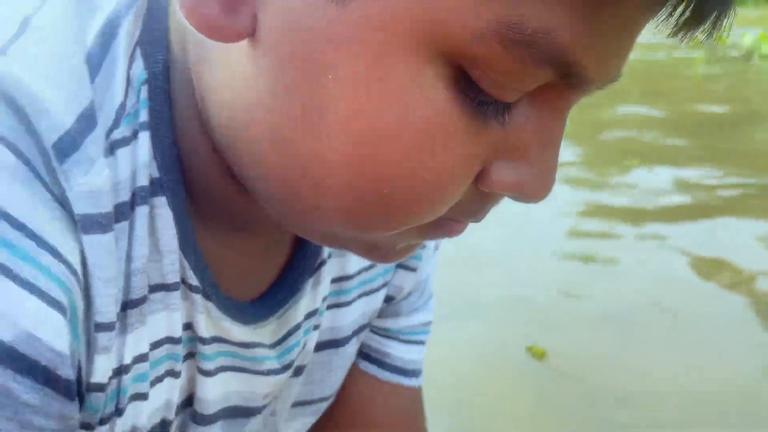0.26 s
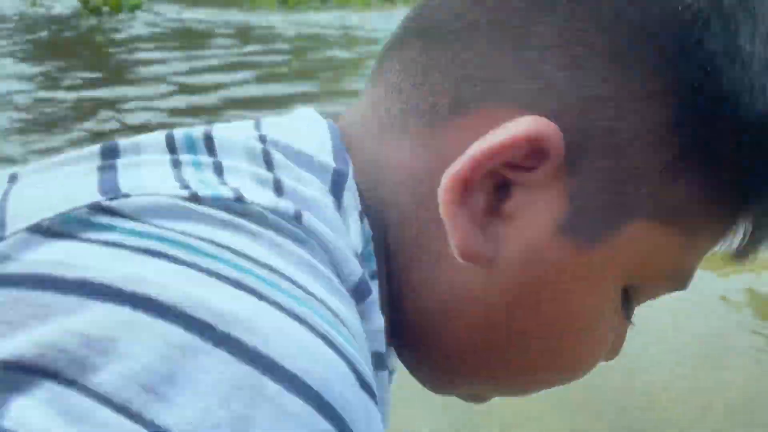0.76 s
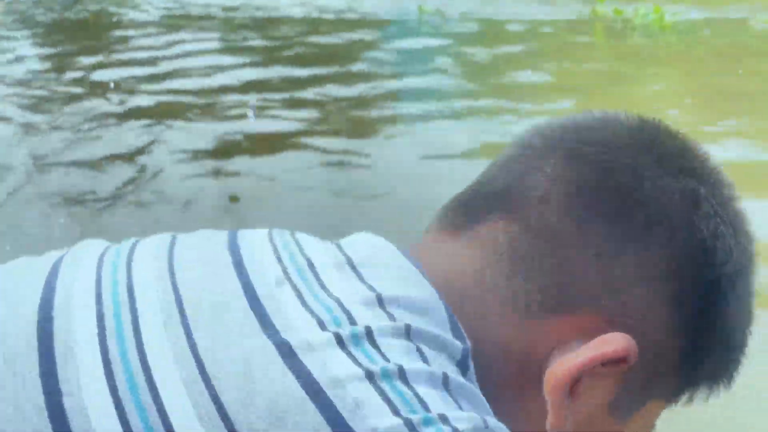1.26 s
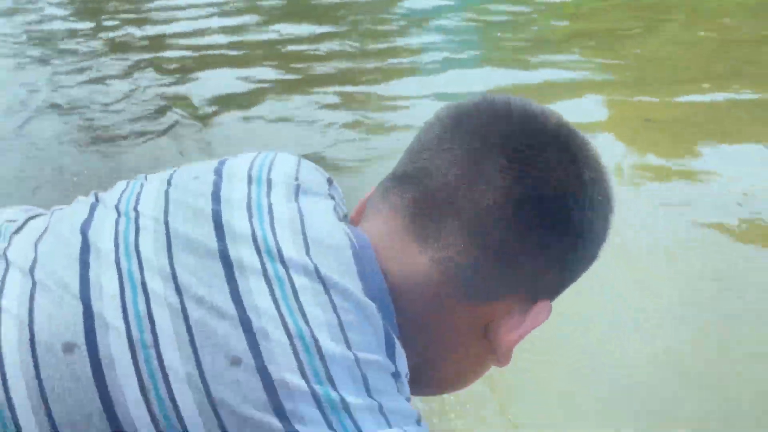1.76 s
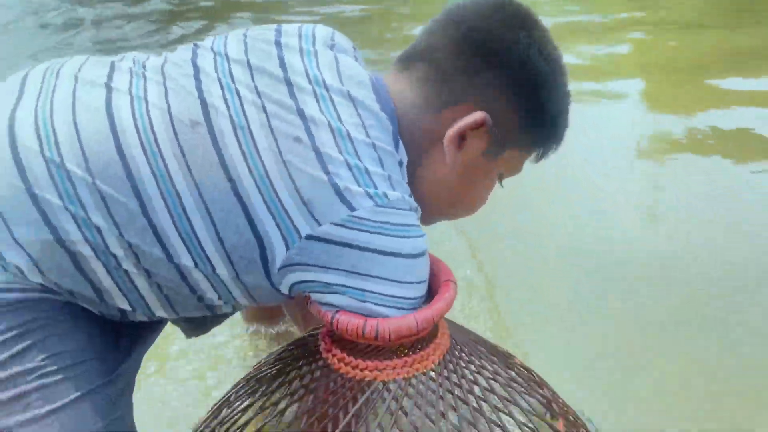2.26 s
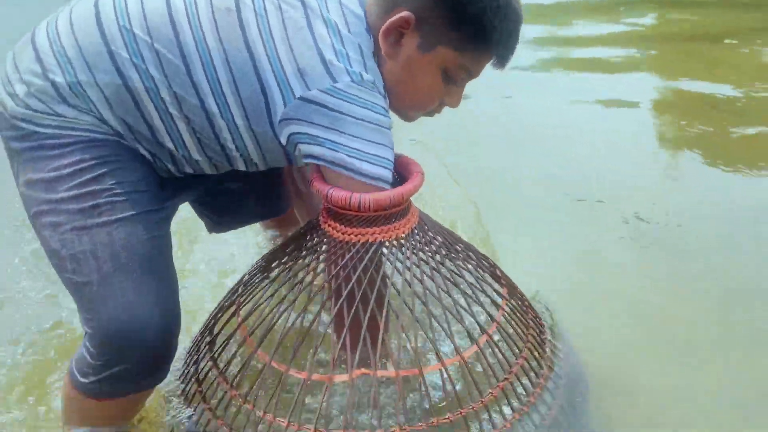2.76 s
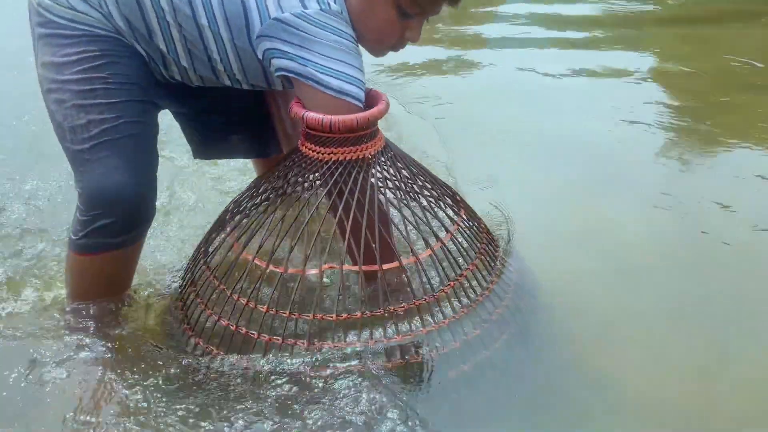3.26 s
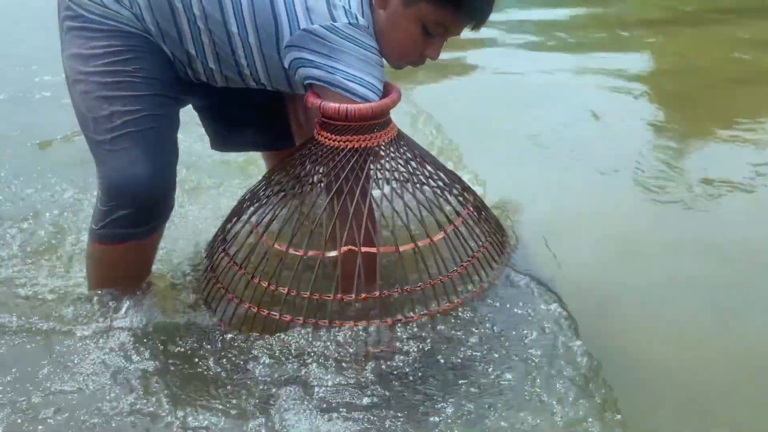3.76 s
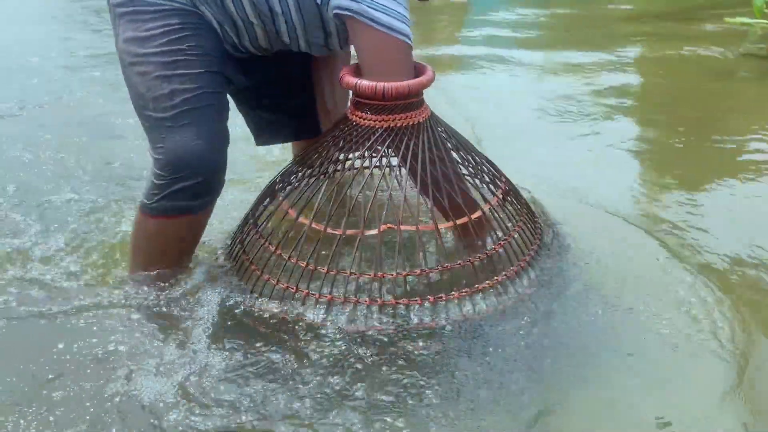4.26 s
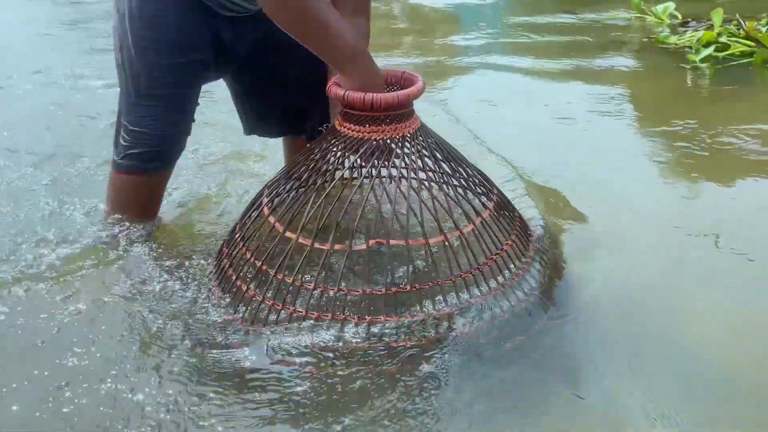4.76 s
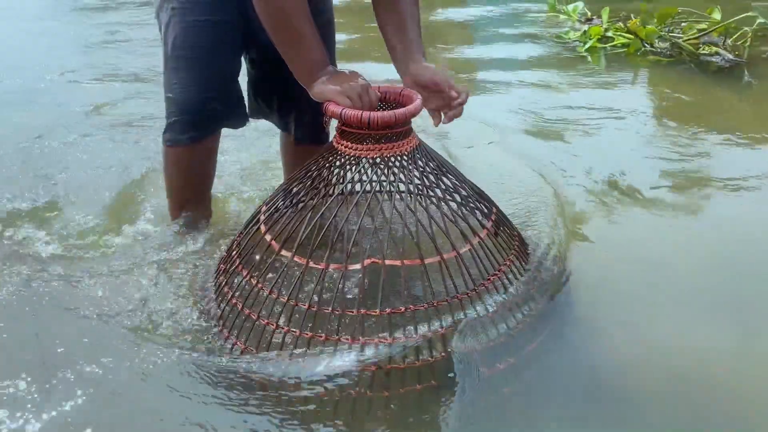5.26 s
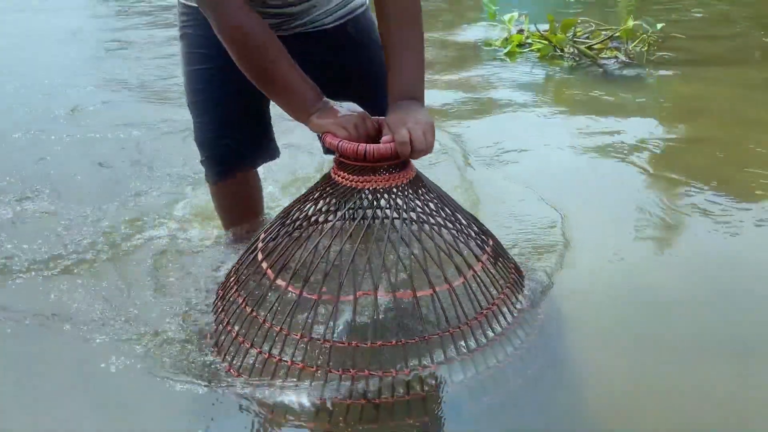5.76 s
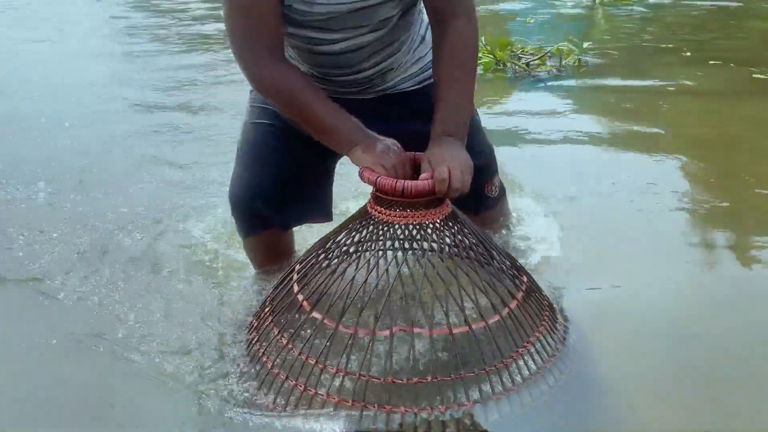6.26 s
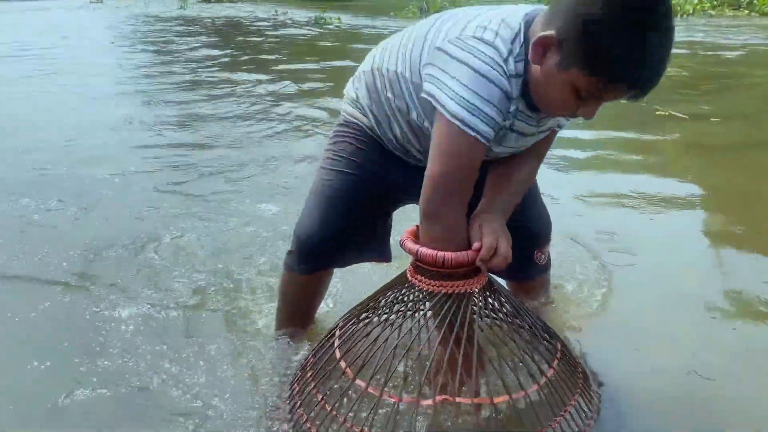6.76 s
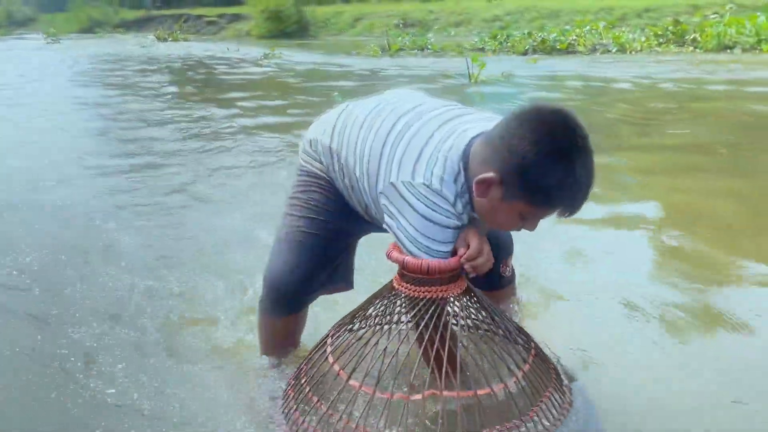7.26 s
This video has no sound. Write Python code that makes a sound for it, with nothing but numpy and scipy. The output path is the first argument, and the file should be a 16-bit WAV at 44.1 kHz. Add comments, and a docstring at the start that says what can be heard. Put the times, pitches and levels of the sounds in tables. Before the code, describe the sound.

Outdoors in a shallow river, a boy stirs water around a bamboo basket trap close to a stereo microphone. Quiet fizz and small plops lead to a sudden hard slap with spattering drops, then fuller gurgling and sloshing builds to its busiest in the middle. It thins to lapping, drips and small splashes. A low engine drone and soft throbbing rumble sit far behind.

```python
"""Someone wades through a shallow river and pushes a bamboo basket trap down into it, close to a pair of microphones.
Stirred water is a cloud of bubbles over a wash of noise: big ones gulp, middling ones gurgle and splash,
the smallest fizz as spray. Plops, drips and the ringing of hard slaps are sines that swell and fade, gurgles slide
in pitch, drops patter back as ringing ticks, and water slaps and bamboo ticks are short noise bursts.
Far off an engine drones as a stack of sines, a faint hum sinks in pitch, and low outdoor noise throbs."""
import sys
import numpy as np
from scipy import signal
from scipy.fft import rfft, irfft, next_fast_len
from scipy.io import wavfile

SR = 44100
rng = np.random.default_rng(int(sys.argv[2]) if len(sys.argv) > 2 else 0)


def master(y):
    """Save y as 16-bit WAV."""
    cut = np.clip(np.atleast_2d(y).T, -1, 1)
    pcm = np.round(cut * 32767)  # scale
    wavfile.write(sys.argv[1], SR, pcm.astype(np.int16))


N = 331632

CUTOFF_HZ = 15800   # top of the sound's range
LEFTWARD_DB = 2   # plops, rings, gurgles and patter lie a little to the left


def from_db(db):
    """Decibels to gain."""
    return 10 ** (np.asarray(db) / 20)


def rms_one(x):
    """Scale to rms 1."""
    return x / np.sqrt(np.mean(x ** 2) + 1e-20)


def at_hz(points, hz):
    """Read a table on a log-frequency axis."""
    f, value = np.transpose(points)
    return np.interp(np.log(np.maximum(hz, 1)), np.log(f), value)


def panned(pan_db):
    """Left and right gains; positive is to the left."""
    return from_db(np.array([[.5], [-.5]]) * pan_db)


def drift(rate):
    """Slow chance of spread 1, changing about rate times a second."""
    hop = 40   # samples between the slow values
    r = np.exp(-2 * hop * np.pi * rate / SR)
    noise = rng.standard_normal(N // hop + 2002)
    slow = signal.lfilter([1], [1, -2 * r, r * r], noise)[2000:]   # drop the filter's run-in
    return np.interp(np.arange(N) / hop, np.arange(len(slow)), rms_one(slow))


def band(x, low, high, order=2):
    """Butterworth band-pass."""
    sos = signal.butter(order, [low, min(high, .45 * SR)], "band", fs=SR, output="sos")
    return signal.sosfilt(sos, x)


def add(out, s, sound):
    """Mix a stereo sound in at time s."""
    start = max(int(s * SR), 0)
    out[:, start:start + sound.shape[-1]] += sound[:, :max(N - start, 0)]


# faint hum far off, sinking in pitch, silent before the first row:
# time_s, pitch_hz, level_db (rms, before flutter)
FAR_HUM = [(6.05, 209, -72), (6.3, 200, -58), (6.6, 183.6, -58), (6.9, 167, -59), (7.25, 157, -61),
           (7.52, 152, -65)]


def far_hum(waver, flutter_db):
    """One unsteady tone, sliding down."""
    s, hz, db = np.transpose(FAR_HUM)
    t = np.arange(N) / SR
    pitch = np.interp(t, s, hz) * (1 + waver * drift(5))
    turns = np.cumsum(pitch) / SR
    level = np.interp(t, s, from_db(db), left=0) * from_db(flutter_db * drift(5))
    return np.sqrt(2) * level * np.sin(2 * np.pi * turns)


# far engine: multiple_of_firing_rate, level_db (rms, before growth and flutter)
ENGINE_ORDERS = [(2, -55), (3, -59), (4, -58), (5, -60), (6, -70), (7, -75), (8, -72)]
# its slowly sinking firing rate, before waver: time_s, rate_hz
FIRING_RATE = [(0.6, 30.63), (1.2, 27.85), (3.6, 27.31), (4.7, 26.28), (7.5, 25.63)]
ENGINE_GROWTH_DB_PER_S = 0.75   # the drone slowly grows


def far_engine(waver, flutter_db):
    """Only the lowest orders carry over the water, each fading in and out in the air."""
    t = np.arange(N) / SR
    firing_hz = np.interp(t, *np.transpose(FIRING_RATE)) * (1 + waver * drift(1.23))
    turns = np.cumsum(firing_hz) / SR
    growth_db = ENGINE_GROWTH_DB_PER_S * (np.arange(N) - N / 2) / SR
    drone = 0
    for order, db in ENGINE_ORDERS:
        level = np.sqrt(2) * from_db(db + growth_db + flutter_db * drift(2.6))
        drone = drone + level * np.sin(2 * np.pi * (round(order) * turns + rng.random()))
    return drone


# colour of the low outdoor rumble, before its band-pass: pitch_hz, density_db (per Hz, relative)
RUMBLE_COLOUR = [(20, -30), (35, -4), (50, 2.5), (70, 10), (95, 3.5), (130, -3), (180, -12), (300, -45)]
RUMBLE_DB = -48.5   # rms
THROB_PER_S, THROB_AT_S = 2.635, 0.335   # rate of the throb, time of one crest


def rumble(spread, throb_db):
    """Low outdoor noise that swells and sinks a few times a second, nearly the same on both sides."""
    colour = from_db(at_hz(RUMBLE_COLOUR, np.arange(N // 2 + 1) * SR / N))
    noise = irfft(rfft(rng.standard_normal((2, N))) * colour, N)
    mid, side = band(noise, 32, 390)
    since_crest = np.arange(N) / SR - THROB_AT_S
    throb = from_db(throb_db * np.cos(2 * np.pi * THROB_PER_S * since_crest))
    return from_db(RUMBLE_DB) * rms_one(throb * (mid + spread * side * [[1], [-1]]))


# water thrown up or running off the trap patters back:
# start_s, length_s, drops, level_db (peak of the largest drop)
SHOWERS = [(0.7, 0.19, 30, -19.5), (3.9, 0.83, 25, -26), (5.65, 0.8, 32, -25), (6.895, 0.05, 11, -27)]
PATTER_LOW_HZ, PATTER_HIGH_HZ, PATTER_CYCLES = 1200, 5000, 2.1   # pitch range; cycles to fall to 1/e
PATTER_RANGE_DB = 13   # largest drop to smallest


def patter():
    """Each falling drop strikes the surface with a sharp tick that rings for a few cycles."""
    out, t = np.zeros((2, N)), np.arange(SR // 40) / SR
    for s, length, count, db in SHOWERS:
        for when, pitch, size, side in rng.random((40, 4))[:int(count)]:
            hz = PATTER_LOW_HZ * (PATTER_HIGH_HZ / PATTER_LOW_HZ) ** pitch
            tick = np.exp(-hz * t / PATTER_CYCLES) * np.sin(2 * np.pi * hz * t)
            gains = from_db(db - PATTER_RANGE_DB * size) * panned(LEFTWARD_DB + 4 * (2 * side - 1))
            add(out, s + length * when, gains * tick)
    return out


# slaps of water and ticks of bamboo, close by:
# start_s, level_db (before the overall level), centre_hz, decay_s, pan_db (left over right)
SLAPS = [(0.5035, -14, 1840, 0.00055, 2), (0.5124, -28, 3530, 0.0039, 8), (0.6867, -18.5, 2200, 0.0037, 1),
         (0.688, -24, 8000, 0.0036, 2), (0.69, -28, 219, 0.0039, -2), (0.7236, -19.5, 1320, 0.014, 3),
         (0.7264, -26.5, 5740, 0.019, 4), (0.7406, -13, 1510, 0.002, 0), (0.7408, -16.5, 3140, 0.0019, 4),
         (0.7417, -25, 8000, 0.0018, 0), (0.741, -16.5, 700, 0.0015, 3), (0.744, -26, 129, 0.0039, 0),
         (.857, -30.5, 5030, 0.0037, 0), (2.444, -23, 1890, 0.0019, 7), (2.545, -21.5, 9000, 0.00093, 2),
         (3.07, -20.5, 10000, 0.0037, 1), (4.257, -27, 9000, .0008, 0), (4.426, -33, 220, 0.0049, -5),
         (5.9197, -21.5, 1490, 0.0018, -1), (5.961, -26, 890, 0.0054, 0), (6.435, -23.5, 7500, 0.00065, 4),
         (6.8822, -26.5, 5450, 0.0028, 1), (6.9, -38.5, 2500, 0.01, 1), (6.936, -37, 3500, 0.0037, 0)]


def slaps(level_db, spread, crack):
    """A sharp contact: one crack, then a burst of spatter that dies within milliseconds."""
    out, t = np.zeros((2, N)), np.arange(SR // 10) / SR
    for s, db, hz, decay, pan_db in SLAPS:
        mid, side = rng.choice([-1., 1.], (2, len(t)))
        burst = (mid + spread * side * [[1], [-1]]) * np.exp(-t / decay)
        burst[:, 0] += crack
        burst = band(burst, hz / 1.9, hz * 1.9, order=3)
        burst *= np.sqrt(decay * SR / np.sum(burst ** 2))   # level holds whatever the decay
        add(out, s, from_db(db + level_db) * panned(pan_db) * burst)
    return out


def bubble(age, cycles, rise, phase=0):
    """A bubble swells for some cycles to peak 1 at age 1, then dies away, rising in pitch near the surface."""
    swell_and_fade = (age * np.exp(1 - age)) ** 2
    return swell_and_fade * np.sin(2 * np.pi * cycles * age * (1 + rise * age) + phase)


# single bubbles and drips, and the short ringing of the hardest slaps and knocks:
# start_s, pitch_hz (at the start), level_db (peak, before the overall level), cycles_to_peak
PLOPS_AND_RINGS = [(0.1622, 770, -24.5, 4), (0.2933, 885, -21, 2.2), (0.3805, 756, -25.5, 1.4),
                   (0.4455, 1020, -26.5, 2.5), (0.6437, 686, -16, 2.8), (0.678, 4150, -29, 3),
                   (0.6872, 495, -5.5, 1.54), (0.688, 1050, -5.5, 0.63), (0.6878, 2900, -19, 7),
                   (0.6934, 530, -13, 0.84), (0.7402, 610, -11.5, 1.2), (0.7405, 3020, -6, 1.7),
                   (0.7445, 520, -22, 1.4), (0.7587, 5380, -25, 3), (0.8252, 2690, -30, 2.4),
                   (0.8365, 2190, -20, 1.6), (0.8388, 930, -15.5, 1.6), (0.9994, 4950, -23.5, 2.2),
                   (1.08, 2480, -22.5, 2.9), (1.0952, 326, -24, 1.8), (1.148, 2800, -23.5, 1.5),
                   (1.2313, 766, -16, 1.7), (1.3202, 1890, -29, 3.1), (1.482, 2070, -25, 2.5),
                   (1.6257, 1370, -29, 3.4), (1.7894, 2690, -26, 2.7), (1.8236, 872, -22.5, 2.9),
                   (1.9091, 840, -11, 2.2), (1.9203, 1300, -13.5, 0.84), (1.926, 1130, -18, 1.7),
                   (1.952, 2580, -19, 2.2), (1.994, 284, -23, 1.9), (2.059, 234, -22, 2.4),
                   (2.078, 683, -22, 2.3), (2.1032, 2260, -23, 2.3), (2.1128, 1130, -18, 2.3),
                   (2.167, 565, -13, 1.5), (2.205, 290, -20, 2.7), (2.2325, 260, -17, 1.5),
                   (2.3575, 1890, -20, 2.4), (2.367, 1070, -18.5, 2.1), (2.3753, 4180, -23, 3),
                   (2.4505, 372, -20.5, 1.7), (2.459, 672, -18, 1.6), (2.4705, 662, -5.5, 2.3),
                   (2.5287, 1900, -18, 2.1), (2.5393, 3490, -26, 3.2), (2.5678, 1037, -17, 1.7),
                   (2.5955, 513, -22, 1.9), (2.6247, 1610, -16, 1.8), (2.6484, 1233, -18, 1.7),
                   (2.935, 1590, -18, 2.1), (2.963, 1345, -19, 1.8), (2.9702, 1345, -20, 2),
                   (2.9863, 1210, -14, 1.3), (3.012, 1140, -17, 2.2), (3.065, 340, -22, 1.5),
                   (3.0722, 1600, -16, 2), (3.0995, 935, -17, 2.2), (3.146, 4150, -24, 3),
                   (3.2082, 666, -24, 1.8), (3.215, 1130, -17, 1.7), (3.227, 350, -24.5, 2),
                   (3.333, 690, -16, 1.2), (3.4723, 311, -29, 7.9), (3.497, 475, -26, 1.6),
                   (3.759, 826, -19, 2), (3.954, 3300, -28, 1.5), (3.966, 2980, -28, 2.8),
                   (4.016, 940, -25, 2), (4.0439, 2420, -27, 4.5), (4.067, 880, -28.5, 2.8),
                   (4.097, 3230, -28, 2.2), (4.1951, 1500, -25, 1.5), (4.2601, 4300, -30, 4),
                   (4.329, 320, -25, 1.9), (4.3471, 2220, -29, 3.6), (4.4185, 349, -25, 2.7),
                   (4.48, 1744, -26, 2.3), (4.538, 1244, -25, 2), (4.8207, 1820, -26.5, 2.3),
                   (4.9718, 2770, -29, 2.6), (5.036, 2740, -29, 3), (5.4052, 3450, -28, 3.3),
                   (5.4229, 1990, -23, 1.7), (5.7761, 2330, -25, 2.8), (5.7834, 540, -21.5, 2.1),
                   (5.919, 1510, -22.5, 1.7), (5.9192, 2720, -16, 1.5), (5.9228, 1300, -24, 1.6),
                   (5.9425, 1150, -29, 1.8), (5.9476, 1050, -19, 1.2), (6.0075, 610, -24, 1.3),
                   (6.0386, 1744, -27, 2), (6.095, 2400, -31, 7.9), (6.112, 1110, -28, 3),
                   (6.114, 285, -34, 1.24), (6.117, 4406, -34, 8), (6.134, 693, -25, 2.4),
                   (6.139, 2700, -30, 5.3), (6.2035, 336, -34, 1.6), (6.2453, 1467, -29, 2.2),
                   (6.344, 2450, -30, 2.7), (6.406, 1744, -28, 2.6), (6.8963, 2050, -21, 2.2),
                   (6.9095, 1400, -32, 1.8), (6.918, 1800, -28, 2.8), (7.013, 1900, -27.5, 2.2),
                   (7.0954, 1480, -30, 1.7), (7.341, 3200, -20.5, 1.9), (7.384, 313, -33.5, 7.1)]


def plops_and_rings(level_db, rise):
    """Ringing sounds that stand out of the cloud, each one swelling and fading tone that rises slightly."""
    out = np.zeros((2, N))
    for s, hz, db, cycles in PLOPS_AND_RINGS:
        cycles = max(cycles, .5)
        age = np.arange(0, 6, hz / (cycles * SR))
        add(out, s, from_db(db + level_db) * panned(LEFTWARD_DB) * bubble(age, cycles, rise))
    return out


# gurgles, bubbles whose pitch slides as they surface or are pushed under:
# start_s, start_hz, end_hz, length_s, level_db (peak, before the overall level)
GURGLES = [(0.523, 540, 590, 0.027, -35), (0.556, 845, 1000, .025, -33), (0.575, 563, 1000, 0.033, -21.5),
           (0.603, 593, 700, 0.057, -26), (0.657, 680, 1300, 0.048, -19.5),
           (0.7203, 872, 780, 0.032, -16.5), (.722, 1492, 1450, 0.029, -17.5),
           (0.848, 606, 720, 0.019, -25), (0.886, 475, 560, 0.025, -28.5), (0.986, 1083, 900, .025, -27),
           (1.393, 400, 456, 0.088, -31), (1.47, 365, 400, 0.089, -35), (2.089, 1986, 2450, .025, -27),
           (2.137, 457, 640, 0.038, -17.5), (2.186, 1500, 1600, .026, -24),
           (2.308, 1405, 1520, .026, -23.5), (2.35, 1726, 1800, .026, -25), (2.38, 282, 305, .035, -26),
           (2.512, 430, 357, 0.049, -21.5), (2.578, 700, 660, .026, -23), (2.587, 951, 1020, .024, -24),
           (2.602, 466, 340, 0.064, -26), (2.611, 520, 600, 0.026, -23), (2.631, 951, 1250, .026, -25),
           (2.658, 338, 290, 0.047, -26), (2.847, 275, 295, .036, -25), (2.946, 532, 422, 0.029, -17.5),
           (2.946, 1250, 1400, 0.037, -23.5), (3.043, 800, 860, .026, -21), (3.098, 616, 670, .026, -22),
           (3.099, 444, 410, 0.04, -24.5), (3.114, 1233, 1150, .025, -23), (3.18, 475, 550, .028, -23),
           (3.189, 1060, 1130, .025, -25), (3.036, 276, 356, 0.052, -19.5), (3.191, 580, 735, 0.042, -22.5),
           (3.265, 434, 480, 0.051, -21.5), (3.31, 281, 320, 0.066, -27.5), (3.385, 205, 272, .06, -30.5),
           (3.497, 800, 860, .026, -25), (3.752, 340, 398, 0.05, -29), (3.754, 783, 1120, 0.045, -25.5),
           (4.041, 515, 623, 0.032, -28), (4.1, 894, 1060, .032, -28.5), (4.134, 387, 450, .032, -30.5),
           (4.228, 1233, 1330, 0.024, -30), (4.357, 920, 1120, 0.029, -29), (5.294, 820, 870, .026, -32),
           (5.648, 1340, 2100, 0.028, -30), (5.679, 993, 1550, .028, -27.5), (5.76, 848, 1400, 0.057, -34),
           (5.792, 445, 410, 0.044, -29), (5.889, 550, 640, 0.033, -29), (5.943, 574, 660, 0.047, -26),
           (6.047, 590, 720, 0.042, -29.5), (6.193, 316, 368, 0.046, -31), (6.22, 794, 888, 0.025, -29.5),
           (6.264, 380, 420, 0.051, -35), (6.354, 598, 660, 0.03, -29), (6.423, 650, 670, 0.031, -33),
           (6.469, 633, 680, 0.033, -29), (6.617, 588, 525, 0.051, -38), (6.66, 475, 736, 0.066, -34),
           (6.897, 2100, 1650, .035, -34), (7.156, 386, 500, 0.071, -36), (7.278, 616, 670, .028, -30.5),
           (7.315, 448, 680, 0.069, -38), (7.502, 321, 360, 0.039, -29)]


def gurgles(level_db, bend, swell):
    """Longer bubbles swell early and fade while their pitch slides ever faster."""
    out = np.zeros((2, N))
    for s, start_hz, end_hz, length, db in GURGLES:
        progress = np.linspace(0, 1, int(length * SR))
        hz = start_hz * (end_hz / start_hz) ** progress ** bend
        envelope = np.sin(np.pi * progress ** swell) ** 2
        ring = envelope * np.sin(2 * np.pi * np.cumsum(hz) / SR)
        add(out, s, from_db(db + level_db) * panned(LEFTWARD_DB) * ring)
    return out


# how alike the water sounds at the two microphones: pitch_hz, likeness (0-1)
LIKENESS = [(150, 0.6), (300, 0.96), (700, 0.09), (1500, 0.11), (3000, 0.18), (5500, 0.3), (8000, 1),
            (15000, 1)]


def wash(hz):
    """Half an octave of smooth rushing from bubbles too many to tell apart; rms 1."""
    alike = np.clip(at_hz(LIKENESS, hz), 0, 1)
    mid, side = band(rng.standard_normal((2, N)), hz * 2 ** (-1 / 4), hz * 2 ** (1 / 4))
    return rms_one(np.sqrt(1 + alike) * mid + np.sqrt(1 - alike) * side * [[1], [-1]])


def bubble_cloud(hz, per_s, size_db, cycles, rise):
    """Random bubbles around hz, many small and few large, each with its own pitch, life, glide and place; rms 1."""
    draws = rng.random((int(per_s * N / SR) + 1, 7))
    when, tuning, damping, bulk, depth, lag, side = draws.T
    pitch = np.minimum(hz * 2 ** (tuning / 2 - 1 / 4), CUTOFF_HZ)
    # most bubbles are quickly damped; a rarer few ring on
    life = .55 * 4 ** damping ** 2
    size = from_db(size_db * np.minimum(-np.log(1 - bulk), 3)) / life ** .25
    swell = cycles * life * SR / pitch   # samples to the peak

    # all bubbles are laid end to end in one long array, then summed at their times
    lengths = (4.5 * swell).astype(int)
    step = np.arange(lengths.sum()) - np.repeat(np.cumsum(lengths) - lengths, lengths)
    at = (np.repeat((when * N).astype(int), lengths) + step) % N
    each = lambda value: np.repeat(value.astype(np.float32), lengths)
    age = step.astype(np.float32) / each(swell)
    turns, glide = each(cycles * life), each(rise * depth)

    # the less alike the two sides, the wider the bubbles scatter in phase and level
    apart = np.sqrt(1 - np.clip(at_hz(LIKENESS, hz), .05, .99))
    phase = apart * (2 * lag - 1)
    gains = size * panned(9 * apart * (2 * side - 1))
    pair = []
    for gain, lead in zip(gains, (phase, -phase)):
        sound = each(gain) * bubble(age, turns, glide, each(lead))
        pair.append(np.bincount(at, sound, N))
    return rms_one(np.array(pair))


# strokes of a leg or the trap through the water, close by:
# full_force_s, hold_s, strength_db (over an ordinary stroke),
# depth_db (more of the big bubbles), spray_db (more of the fizz)
STROKES = [(0, 0.053, -14.5, 0, 15), (.3, .05, -12.5, 4, 12.5), (.56, 0.036, -7.5, 0, 11),
           (.71, 0.033, 4.5, -11, 4.5), (.8, 0.024, 3, -7, -4), (1.06, 0.024, -11, 17, 2),
           (1.27, 0.35, -1, 5, 2), (1.7, 0.12, -4, 10.5, 2.5), (1.92, 0.15, 2.5, 1.5, -0.5),
           (2.12, 0.14, 5.5, 4, 0.5), (2.23, .02, -2, 18, -11), (2.34, 0.023, 8.5, -1, -5.5),
           (2.45, 0.11, 7, 0.5, -1.5), (2.59, 0.063, 9, -2, -0.5), (2.78, 0.022, 5.5, 2.5, 0),
           (2.86, 0.044, 1.5, 6.5, 6), (2.95, 0.03, 7, 4.5, 3.5), (3.05, 0.053, 8, 6.5, 4),
           (3.18, 0.029, 7, -1, -2.5), (3.3, 0.065, -1.5, -8, 5.5), (3.46, 0.075, -1.5, 7.5, 5.5),
           (3.68, 0.089, -1, 5, -2), (3.96, 0.1, -1.5, 2.5, -1.5), (4.21, 0.037, -2, -9, 0.5),
           (4.35, 0.02, -4.5, 5.5, 1), (4.49, 0.037, -1.5, 2, -6), (4.72, .1, -3.5, -20, 3.5),
           (4.98, 0.11, -21, 19.5, -27), (5.41, 0.17, -7, 4, 4), (5.73, 0.2, -1, 0.5, -1),
           (6.17, 0.074, -2.5, 9.5, -6), (6.391, 0.097, 0, -7, 0.5), (6.67, 0.085, -5, -3, 0),
           (6.91, 0.027, -3.5, -4, -5), (7.3, .25, 0.5, -3.5, 1)]
ATTACK_S, FALL_DB_PER_S = 0.19, 58   # a stroke gathers force, then its water falls back
FOAM_DB, FOAM_FALL_DB_PER_S = -11, 37   # the foam it leaves goes on bubbling
LAPPING_DB, LAPPING_DEPTH_DB = -5.5, -0.5   # shallow lapping at the legs and the trap between strokes


def stirring(t, depth_share, spray_share):
    """How hard the water is stirred at times t, in dB: each stroke swells, holds, falls back and leaves foam."""
    power = from_db(LAPPING_DB + depth_share * LAPPING_DEPTH_DB) ** 2
    for s, hold, db, depth_db, spray_db in STROKES:
        swell = np.clip(1 + (t - s) / ATTACK_S, 0, 1)
        since = np.maximum(t - s - hold, 0)
        fall_db = depth_share * depth_db + spray_share * spray_db - FALL_DB_PER_S * since
        foam_db = FOAM_DB - FOAM_FALL_DB_PER_S * since
        power = power + (swell * from_db(db + np.maximum(fall_db, foam_db))) ** 2
    return 10 * np.log10(power)


# the four parts of stirred water, gulp, gurgle, splash and spray:
# centre_hz, level_db (at an ordinary stroke, before colour), follows (dB per dB of stirring),
# depth_share, spray_share (how much of a stroke's depth and spray the part takes)
PARTS = [(266, -49.5, 1.0, 1, 0), (595, -45.5, 0.83, 0.32, 0.58), (1720, -43.5, 1.0, 0.044, 0),
         (6030, -43, 0.9339, 0.058, 0.65)]
# colour of stirred water: pitch_hz, density_db (per Hz, relative)
WATER_COLOUR = [(170, -17.5), (220, -13.5), (290, -1.5), (400, -2), (600, -0.5), (900, -3), (1500, -8.5),
                (2500, -13.5), (4000, -20), (6000, -25.5), (9000, -26), (12500, -32.5), (16000, -36)]
# bubbles by size: pitch_hz, bubbles_per_s (in half an octave), power_share (0-1, before crowding),
# pan_db (left over right), cycles_to_peak (before each bubble's own life)
SIZES = [(197.7, 70, 0.97, 1.5, 2.1), (583.6, 200, 0.84, 2.5, 3.35), (1420, 360, 0.59, -0.5, 4.45),
         (2770, 380, 0.4, 2.5, 4.7), (4800, 450, 0.5, 4, 3.8), (9350, 500, 0.54, -1, 7)]
# drops falling back, in each half octave: level against the cloud, rate, cycles to the peak before each one's life
DROPS_DB, DROPS_PER_S, DROP_CYCLES = -12.5, 12, 8.05
DROP_LOW_HZ, DROP_HIGH_HZ = 900, 4500   # half octaves centred between these have drops


def stirred_water(surge_db, patchy_db, crowding):
    """Each size of bubble follows its part of the stirring; surges lift all sizes together."""
    s = np.arange(0, N / SR, .005)
    part_hz = [part[0] for part in PARTS]
    levels = np.array([db + follows * stirring(s, *shares) for _, db, follows, *shares in PARTS])
    centres = 180 * 2 ** (np.arange(14) / 2)
    out, surge = 0, surge_db * drift(30.0)
    for hz in centres:
        per_s, share, pan_db, cycles = (at_hz(np.array(SIZES)[:, [0, k]], hz) for k in range(1, 5))
        # blend the two parts nearest in pitch
        weights = [at_hz(list(zip(part_hz, part)), hz) for part in np.eye(len(PARTS))]
        stir_db = np.interp(np.arange(N) / SR, s, weights @ levels)

        # hard stirring crowds the bubbles until they merge into the wash
        share = np.clip(share * from_db(-crowding * (stir_db - stir_db.mean())), 0, 1)
        cloud = bubble_cloud(hz, per_s, size_db=2.5, cycles=max(cycles, 1), rise=.05)
        grain = np.sqrt(share) * cloud + np.sqrt(1 - share) * wash(hz)
        if DROP_LOW_HZ < hz < DROP_HIGH_HZ:
            drops = bubble_cloud(hz, DROPS_PER_S, size_db=2.5, cycles=DROP_CYCLES, rise=0.028)
            grain = grain + from_db(DROPS_DB) * drops

        # density per Hz becomes level per half octave
        colour_db = at_hz(WATER_COLOUR, hz) + 10 * np.log10(hz / centres[0])
        level_db = stir_db + colour_db + surge + patchy_db * drift(16.5)
        out = out + grain * from_db(level_db) * panned(pan_db)
    return out


def scene():
    """Water close by, the drone and the hum far behind it."""
    far = far_hum(waver=0.008, flutter_db=1.0) + far_engine(waver=0.0082, flutter_db=4.5)
    background = far + rumble(spread=0.096, throb_db=2.5)
    contacts = patter() + slaps(level_db=-1.0, spread=0.25, crack=5.1)
    ringing = plops_and_rings(level_db=-2.5, rise=0.0068) + gurgles(level_db=-4.0, bend=1.42, swell=0.69)
    water = stirred_water(surge_db=1.0, patchy_db=1.09, crowding=0.044)
    return background + contacts + ringing + water


# phase by which the left microphone leads; in the treble the right one hears first: pitch_hz, lead_rad
LEAD = [(60, 0), (400, .35), (1000, .8), (2000, .2), (3500, .8), (5400, .7), (6500, -.9), (8000, -3.1),
        (10000, -5.1), (11600, -6.3), (13200, -7.7), (15000, -9.4)]


def record(dry):
    """The two microphones differ in phase; the highest peaks are rounded and the top is cut."""
    size = next_fast_len(N + SR // 10)
    hz = np.arange(size // 2 + 1) * SR / size
    turn = np.exp(1j * at_hz(LEAD, hz) * np.array([[.5], [-.5]]))
    pair = irfft(rfft(dry, size) * turn, size)[:, :N]
    rounded = np.tanh(pair)
    return signal.sosfilt(signal.ellip(12, .1, 80, CUTOFF_HZ, fs=SR, output="sos"), rounded)


dry = scene()
out = record(dry)
master(out)
```